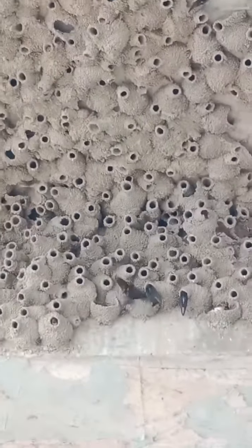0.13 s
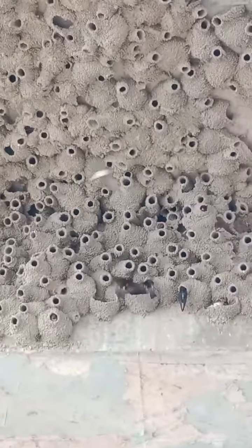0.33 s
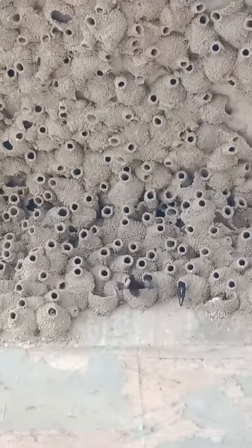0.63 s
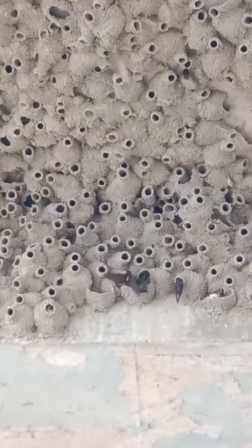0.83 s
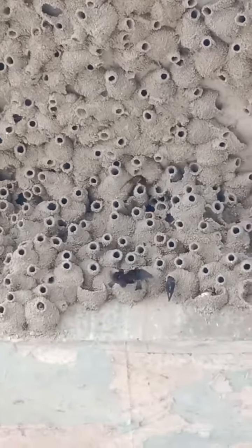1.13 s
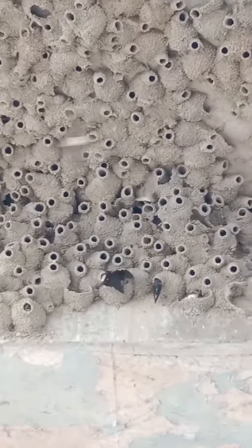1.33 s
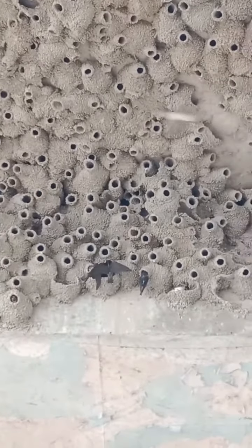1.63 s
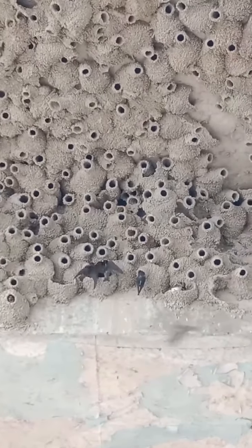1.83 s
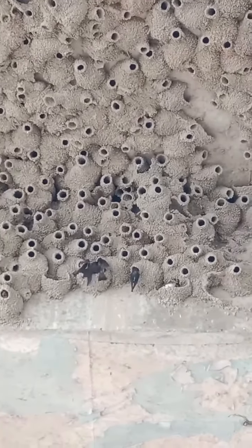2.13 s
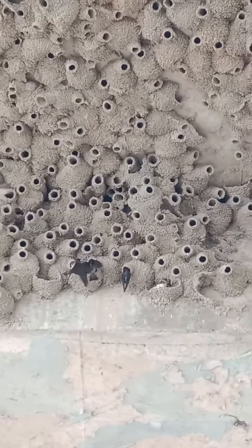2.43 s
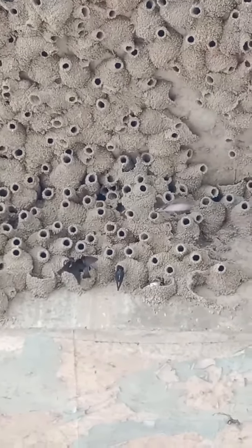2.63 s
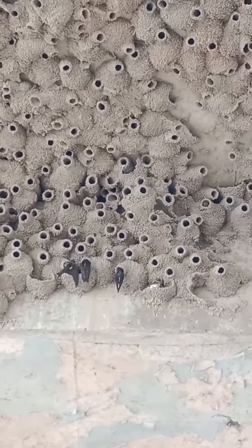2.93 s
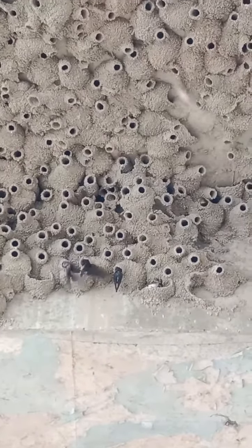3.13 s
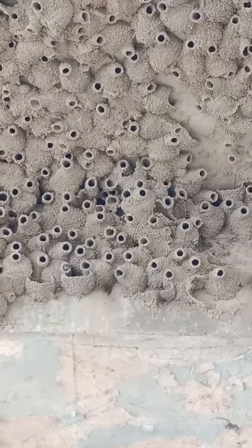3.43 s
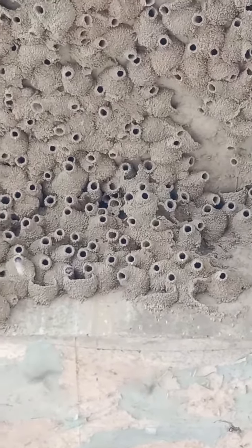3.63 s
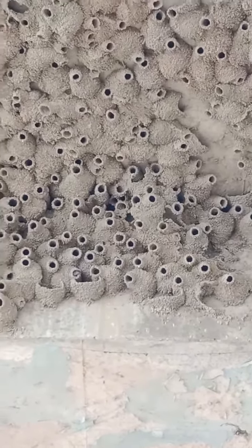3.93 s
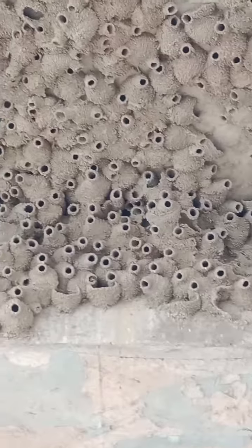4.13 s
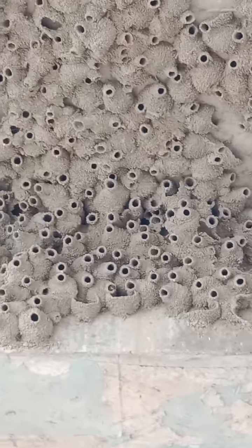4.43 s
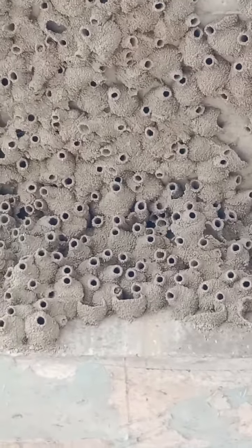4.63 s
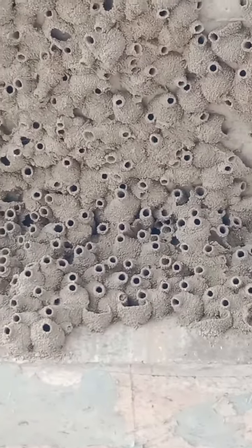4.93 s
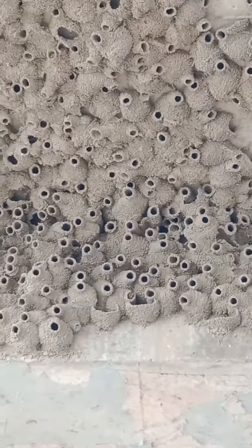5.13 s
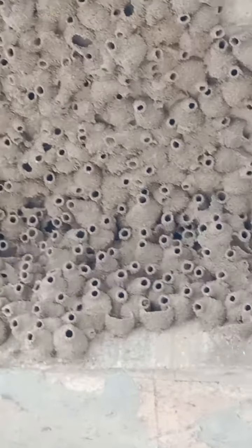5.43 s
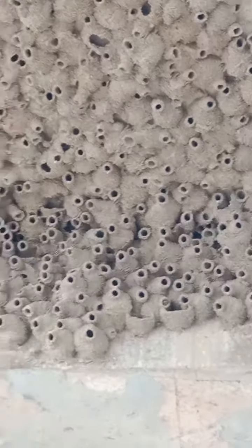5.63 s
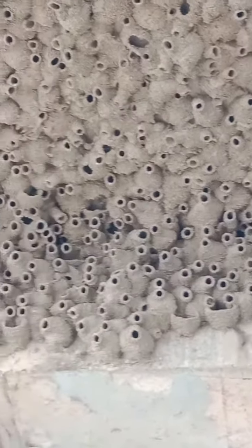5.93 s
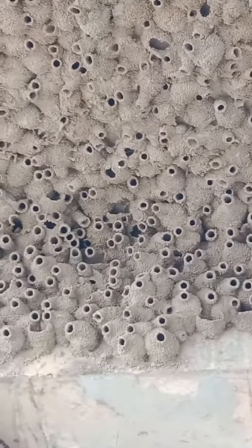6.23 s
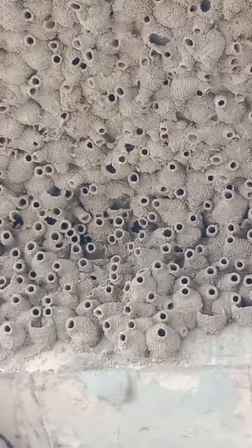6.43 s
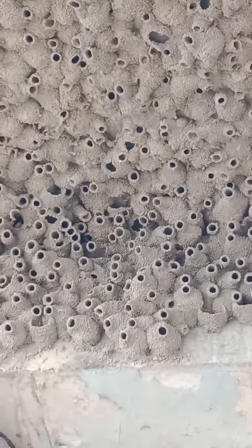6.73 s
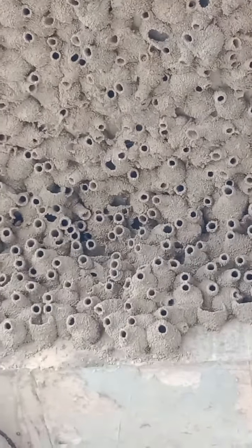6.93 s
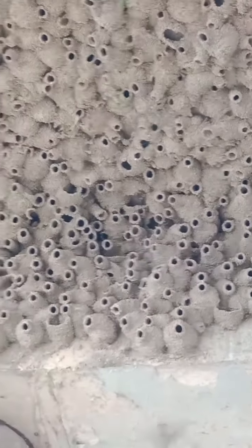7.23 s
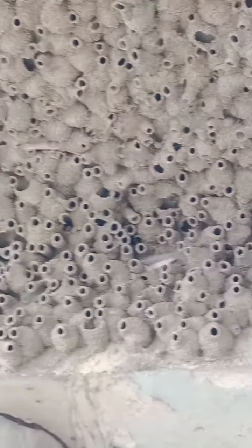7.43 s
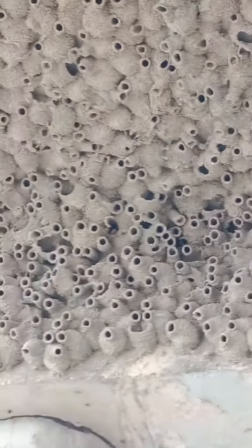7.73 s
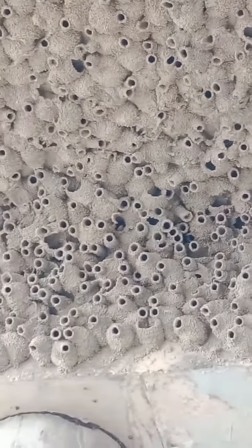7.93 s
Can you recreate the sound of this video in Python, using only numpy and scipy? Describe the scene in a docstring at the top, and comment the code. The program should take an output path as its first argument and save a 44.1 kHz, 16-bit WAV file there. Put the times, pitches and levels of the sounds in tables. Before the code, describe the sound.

Outdoors beside a wall of nests, many swallows twitter together in thick pulsing bursts, mixed with raspy churrs and little steady pips. The crowd then recedes and brief, sharp chirps stand apart, mostly sliding steeply downward, with occasional buzzes and a rapid twitter near the middle. Close wall reflections blur them slightly. A dull airy wash and faint deep wind thumps lie below; the mono sound is dull on top and slightly grainy.

```python
"""A wall of mud nests where a swallow colony calls, heard through a small mono microphone that loses its treble.
Near birds are gliding tones: mostly falling whistles, buzzy churrs, short pips and a quick twitter, with echoes.
The far flock is a swelling hiss: whistles, blips and noise, blurred by echoes and let through in three bands.
Below it lie a dull noise wash with narrow tonal traces, faint low air, and wind bumping the microphone.
A noise suppressor and a faint treble fizz like an audio coder's colour it all; table levels are ahead of these."""
import sys
import numpy as np
from scipy import signal
from scipy.fft import rfft, irfft, next_fast_len
from scipy.io import wavfile
from scipy.ndimage import uniform_filter1d

SR = 44100
rng = np.random.default_rng(int(sys.argv[2]) if len(sys.argv) > 2 else 0)


def master_out(mix):
    """Clip the mix to full scale and print it as 16-bit PCM to the path in sys.argv[1]."""
    frames = np.transpose(np.atleast_2d(mix))
    ceiling = np.clip(frames, -1, 1)
    pcm = np.round(ceiling * 32767).astype(np.int16)
    wavfile.write(sys.argv[1], SR, pcm)


N = 356460
FRAME, HOP = 512, 128  # short-time spectrum [samples]

ECHO_DB, ECHO_DB_PER_S = -4, -150  # wall echo; a later one has come further and is weaker
SECOND_ECHO_S, SECOND_ECHO_DB = .021, -14.5  # from the ledge below, after the first
# once under way, a whistle is loudest where its pitch passes the resonance of the open beak
BEAK_HZ, BEAK_DB_PER_KHZ2 = 5200, -4
# near whistles, mostly falling: (time [s], length [s], first pitch [Hz], last pitch [Hz], bend [power],
# start level [dB], level at the beak resonance [dB], wall echo delay [s])
WHISTLE_CALLS = [(0.846, 0.063, 6800, 3430, 3.6, -34, -37, 0.0075),
                 (1.104, 0.048, 6700, 7000, 1.3, -50, -44, 0.0043),
                 (1.315, 0.047, 6300, 5570, 1.5, -49, -44, 0.0046),
                 (1.642, 0.076, 6430, 2975, 4.3, -50.5, -40.5, 0.018),
                 (2.531, 0.051, 6840, 3540, 2.6, -46.5, -42, 0.0075),
                 (2.616, 0.034, 5960, 2530, 1.4, -47, -41, 0.014),
                 (2.826, 0.045, 6100, 6400, 1.2, -57, -57, 0.0058),
                 (2.874, 0.025, 5770, 3450, 1.1, -50.5, -46.5, 0.0067),
                 (2.893, 0.058, 6640, 3210, 1.3, -47, -46.5, 0.013),
                 (2.948, 0.016, 5100, 2720, 1.1, -51.5, -43, 0.011),
                 (3.026, 0.062, 6900, 3250, 3.1, -51, -45.5, 0.01),
                 (3.135, 0.047, 6400, 3510, 1.8, -49.5, -37.5, 0.021),
                 (3.148, 0.046, 6310, 3285, 1.4, -49, -42.5, 0.019),
                 (3.186, 0.032, 6060, 4070, 1.2, -47.5, -46, 0.0023),
                 (3.606, 0.081, 6500, 3000, 3.3, -64.5, -48, 0.004),
                 (3.674, 0.048, 6150, 3310, 4.1, -49.5, -38.5, 0.0041),
                 (3.666, 0.033, 7200, 6100, 1.4, -52, -47, 0.0051),
                 (3.737, 0.057, 6350, 3175, 2.6, -49, -34.5, 0.011),
                 (3.864, 0.046, 6600, 3330, 2.1, -59.5, -45.5, 0.018),
                 (3.968, 0.032, 6300, 3490, 1.2, -52, -47, 0.0084),
                 (3.989, 0.058, 6050, 3490, 2.1, -45.5, -38, 0.011),
                 (4.031, 0.013, 8200, 6400, 1.1, -42, -39.5, 0.0055),
                 (4.044, 0.045, 6400, 6540, 1.2, -44.5, -40, 0.006),
                 (4.066, 0.032, 6200, 3700, 1.5, -42.5, -39, 0.008),
                 (4.303, 0.025, 6500, 4010, 1.6, -58, -54.5, 0.023),
                 (4.309, 0.052, 6300, 3400, 1.9, -59, -49, 0.0081),
                 (4.345, 0.032, 6300, 4140, 1.4, -58, -50, 0.009),
                 (4.375, 0.05, 6800, 6000, 2.6, -56, -52, 0.011),
                 (4.601, 0.028, 5850, 3570, 1.8, -62, -52, 0.0072),
                 (4.838, 0.06, 6350, 4530, 2.4, -60.5, -50, 0.0088),
                 (4.948, 0.065, 7200, 4280, 1.4, -52.5, -44.5, 0.0098),
                 (5.043, 0.023, 6260, 3930, 0.95, -50, -51, 0.0026),
                 (5.074, 0.053, 6550, 4510, 3, -56.5, -54, 0.01),
                 (5.239, 0.056, 6200, 4000, 1.9, -54, -45.5, 0.01),
                 (5.259, 0.05, 6490, 3290, 3.1, -49.5, -42.5, 0.0066),
                 (5.322, 0.02, 6400, 4100, 1.3, -46.5, -33.5, 0.006),
                 (5.451, 0.044, 6600, 3590, 1.6, -53, -46.5, 0.031),
                 (5.597, 0.048, 6250, 4000, 1.8, -52, -46.5, 0.004),
                 (5.651, 0.028, 6480, 4300, 1.1, -57, -46, 0.018),
                 (5.763, 0.034, 6380, 4530, 5.5, -55.5, -46, 0.0023),
                 (5.79, 0.025, 4850, 3840, 1.2, -42, -44.5, 0.009),
                 (5.796, 0.047, 6390, 6280, 1.1, -53.5, -53.5, 0.006),
                 (5.899, 0.064, 6990, 2990, 1.9, -47, -36.5, 0.0032),
                 (6.045, 0.047, 6300, 3090, 1.8, -53, -42, 0.024),
                 (6.461, 0.058, 6500, 4300, 2.4, -59.5, -46.5, 0.008),
                 (6.691, 0.045, 6200, 5010, 2.8, -58, -55, 0.0055),
                 (7.043, 0.04, 6750, 5700, 1.8, -53.5, -48.5, 0.006),
                 (7.207, 0.059, 7050, 3320, 3.6, -66.5, -52, 0.0036),
                 (7.418, 0.063, 6350, 3210, 4.1, -50.5, -45, 0.008),
                 (7.545, 0.045, 7050, 6300, 1.2, -60, -50, 0.0061),
                 (7.558, 0.068, 6350, 3320, 3.5, -57.5, -41, 0.01),
                 (7.575, 0.024, 5200, 3180, 1.2, -55, -50, 0.009),
                 (7.711, 0.045, 6100, 4860, 1.7, -45.5, -40.5, 0.0079),
                 (7.76, 0.045, 6500, 7100, 0.87, -54, -40, 0.005),
                 (7.777, 0.064, 6250, 2990, 3.6, -44.5, -39, 0.007),
                 (7.815, 0.038, 6400, 2296, 1.1, -45, -44, 0.0087),
                 (7.828, 0.013, 8000, 5520, 0.98, -39.5, -46.5, 0.011)]


def whistles():
    """Near whistles, favoured by the beak resonance, each echoed by the wall and then the ledge."""
    out = np.zeros(N)
    for s, length, first_hz, last_hz, bend, start_db, beak_db, echo_s in WHISTLE_CALLS:
        middle_and_end = np.array([.5, .8])
        passing_hz = first_hz - (first_hz - last_hz) * middle_and_end ** bend
        levels_db = beak_db + BEAK_DB_PER_KHZ2 * ((passing_hz - BEAK_HZ) / 1000) ** 2
        call = whistle(length, first_hz, last_hz, bend, start_db, *levels_db)
        add(out, s, call)
        add(out, s + echo_s, amp(ECHO_DB + ECHO_DB_PER_S * echo_s) * call)
        add(out, s + echo_s + SECOND_ECHO_S, amp(SECOND_ECHO_DB) * call)
    return out


def whistle(length, first_hz, last_hz, bend, start_db, middle_db, end_db):
    """A tone bending from first to last pitch with a grainy burr; the voice gives out at the low end."""
    u = np.linspace(0, 1, round(length * SR))
    hz = first_hz - (first_hz - last_hz) * u ** bend
    burr = evened(amp(3.3 * wobble(len(u), 60)))
    level = burr * amp(np.interp(u, [.12, .5, .8], [start_db, middle_db, end_db]))
    low_end = np.clip((hz - 2700) / 1100, 0, 1)
    unsteady_hz = hz * (1 + .012 * wobble(len(u), 40))
    return level * low_end * signal.windows.tukey(len(u), .15) * tone(unsteady_hz)


# buzzy churrs: (time [s], length [s], middle pitch [Hz], slide over the note [Hz], level [dB],
# octave over the fundamental [dB], mean throb rate [per s])
CHURR_CALLS = [(0.131, 0.12, 3600, 501, -46.5, -28, 70), (0.134, 0.11, 5170, 202, -49, -41, 75),
               (0.255, 0.19, 4380, 306.5, -42, -22, 66), (0.605, 0.23, 4310, -900, -43.5, -26.5, 90),
               (1.19, 0.12, 4910, -47, -48.5, -30, 77), (1.834, 0.1, 3007, -44, -51, 1, 68),
               (2.019, 0.13, 3173, -52, -49, -11.5, 42), (2.225, 0.12, 3124, -63, -48.5, -5.5, 69),
               (2.661, 0.12, 4370, -52, -47.5, -37, 64), (3.145, 0.083, 2836, -54, -57.5, -35, 69),
               (3.671, 0.19, 2984, -49.5, -55.5, -9.5, 74), (3.703, 0.14, 4930, -42.5, -46.5, -28.5, 60),
               (4.032, 0.046, 3183, -41, -48, -2, 60), (4.493, .07, 4050, -42, -52, -31, 91),
               (4.716, 0.075, 4730, -56.5, -47, -34, 110), (4.945, 0.075, 4300, -49.5, -46, -35, 80),
               (5.214, 0.028, 3670, -48.5, -55, -3.5, 79), (5.596, 0.115, 3680, -45.5, -58.5, -28, 42),
               (6.827, 0.028, 3410, -54.5, -51.5, -5, 120), (6.886, 0.076, 3620, -45.5, -45.5, -24.5, 54),
               (7.05, 0.048, 3160, -43.5, -54.5, -3.5, 57), (7.647, 0.14, 4325, -50.5, -45, -31, 54),
               (7.96, 0.27, 4160, -41.5, -57.5, -26, 56)]


def churrs():
    """Near buzzy calls, one after another and sometimes overlapping."""
    out = np.zeros(N)
    for s, *shape in CHURR_CALLS:
        add(out, s, churr(*shape))
    return out


def churr(length, hz, slide_hz, db, octave_db, rate):
    """A hoarse note chopped into throbs; each throb swells while its pitch flicks up."""
    count = round(length * SR)
    uneven_rate = rate * (1 + .3 * wobble(count, 500))
    phase = np.cumsum(uneven_rate) / SR % 1
    throb = .35 + np.sin(np.pi * phase ** 1.36) ** 2
    hoarse = evened(throb * amp(3.6 * wobble(count, 54)))
    slide = hz + slide_hz * np.linspace(-.5, .5, count)
    pitch = slide * (1 + .22 * (phase - .6) + .03 * wobble(count, 60))
    return amp(db) * hoarse * tone(pitch, octave_db) * signal.windows.tukey(count, .08)


# short pips: (time [s], peak level [dB], pitch [Hz])
PIP_CALLS = [(.787, -43, 2280), (1.086, -42, 2280), (0.841, -36.5, 2290), (1.0066, -40, 2220),
             (1.2361, -35.5, 2340), (1.4277, -37.5, 2180), (2.0028, -38, 2300), (2.4184, -37.5, 2350),
             (2.905, -38.5, 3020), (2.962, -44, 2400)]


def pips():
    """Steady tones of 11 ms that swell and fade in one smooth hump."""
    out = np.zeros(N)
    for s, peak_db, hz in PIP_CALLS:
        note = tone(np.full(500, float(hz))) / np.sqrt(2)
        add(out, s, amp(peak_db) * note * np.hanning(500))
    return out


# twitter notes: (time [s], length [s], level added to the note shape [dB])
TWITTER_CALLS = [(4.886, 0.018, -34), (4.907, .016, -35), (4.926, 0.015, -30.5)]
# shape of each note, which dips, then flicks up:
# (share of the note [0-1], pitch [Hz], relative level [dB], octave over the fundamental [dB])
TWITTER_SHAPE = [(0, 3000, -8, 0.5), (.37, 2188, -17, 10), (.6, 2786, -16, -1.5), (.85, 4370, -2.5, -11.5),
                 (1, 3730, -13, -16)]


def twitter():
    """A quick run of notes whose pitch, level and octave follow one smoothed contour."""
    out = np.zeros(N)
    share, *columns = np.transpose(TWITTER_SHAPE)
    for s, length, note_db in TWITTER_CALLS:
        u = np.linspace(0, 1, round(length * SR))
        hz, db, octave_db = (uniform_filter1d(np.interp(u, share, c), size=60) for c in columns)
        add(out, s, amp(note_db + db) * tone(hz, octave_db) * signal.windows.tukey(len(u), .2))
    return out


def near_birds():
    """All the calls that stand out."""
    return whistles() + churrs() + pips() + twitter()


SHRILL_HZ, SHRILL_FADES = 6730, 0.79  # the top edge sinks faster than the high band: extra dB per dB
# colour of the flock: (pitch [Hz], relative level [dB per Hz])
FLOCK_SPECTRUM = [(1120, -32.5), (1900, -13.5), (2050, -12), (2340, -5.5), (2850, -6.5), (3960, -5),
                  (4940, -5), (6390, -13.5), (6780, -16.5), (7920, -22.5), (10300, -51), (17400, -120)]
# bands the noise suppressor darkens, and one it leaves, in quiet passages: (pitch [Hz], width [Hz], gain [dB])
QUIET_BANDS = [(2160, 445, -12), (2770, 85, 6), (3076, 540, -5.5)]


def flock():
    """Hundreds of far calls smeared by echoes into a hiss; its low, middle and high bands swell apart."""
    calls = np.zeros(N)
    for when, long, first, last, bend, loud in rng.random((260, 6)):
        db = 5 * loud
        call = whistle(0.022 + 0.052 * long, 5000 + 2000 * first, 2300 + 1500 * last, 1 + 4.2 * bend,
                       db - 0.5, db, db)
        add(calls, when * N / SR, call)
    close = .16 * evened(calls) + .65 * evened(chatter())
    blur = signal.oaconvolve(close, tail(0.29))[:N]
    hiss = filtered(rng.standard_normal(N), FLOCK_SPECTRUM)
    hiss = hiss + filtered(hiss, [(6000, -27.5), (6800, -1)])  # extra smooth hiss fills the top edge

    def rule(s, hz, patches):
        low = np.clip((3500 - hz) / 300, 0, 1)
        high = np.clip((hz - 5200) / 600, 0, 1)
        mid_db, low_db, high_db = flock_levels(s[0])
        db = mid_db + low * (low_db - mid_db) + high * (high_db - mid_db)
        db = db + SHRILL_FADES * np.clip((hz - SHRILL_HZ) / 500, 0, 1) * (high_db + 47.5)
        quiet = np.clip((-44.0 - low_db) / 12, 0, 1)
        bands_db = sum(band_db * np.exp(-((hz - f) / width) ** 2) for f, width, band_db in QUIET_BANDS)
        # the noise suppressor leaves thin held streaks in quiet passages, most in the low band
        streaks_db = (1.1 + quiet * (.8 + 3.8 * low)) * np.minimum(patches, 1.2)
        return unit(FLOCK_SPECTRUM, hz) * amp(db + quiet * bands_db + streaks_db)

    mix = close + .25 * evened(blur) + .36 * evened(hiss)
    return shaped(mix + 0.0079 * rng.standard_normal(N), rule, patch_bins=2, patch_frames=17)


def chatter():
    """A rain of tiny sliding blips, the throbs of many churring birds."""
    out = np.zeros(N)
    t = np.arange(240) / SR
    for pitch, slide in rng.random((60, 2)):
        hz = 2500 + 3700 * pitch + 260000 * (slide - .25) * (t - t.mean())  # most slide upward
        blip = np.hanning(len(t)) * tone(hz)
        for when, size in rng.random((170, 2)):
            add(out, when * N / SR, blip * amp(7 * size))
    return out


RISE_DB_PER_S, FALL_DB_PER_S = 418, 453
LOW_LATE_S, HIGH_SAG_DB_PER_S = 0.006, 28  # the low band opens late; the high band sags
# outer bands: level at a murmur of -50 dB [dB], change per change of the murmur [dB per dB]
LOW_MURMUR_DB, LOW_MURMUR_SLOPE = -50 - 2.74, 1.27
HIGH_MURMUR_DB, HIGH_MURMUR_SLOPE = -50 - 3.5, 1
# stretches where the suppressor's gate opens on the flock: (time [s], length before the fall [s],
# middle band [dB], low band [dB], high band [dB])
FLOCK_OPENINGS = [(0.0, 0.027, -43, -45, -38.5), (0.126, 0.33, -40.5, -43.5, -36),
                  (0.596, 0.349, -40.5, -44, -36), (0.972, 0.13, -41.5, -45.5, -38.5),
                  (1.154, 0.08, -45, -50, -43.5), (1.262, 0.076, -42.5, -43.5, -38.5),
                  (1.448, 0.1, -43.5, -46, -45.5), (1.642, 0.11, -41.5, -41, -39.5),
                  (1.829, 0.13, -43, -42.5, -41), (2.024, 0.099, -42.5, -41, -39),
                  (2.265, 0.099, -42, -43.5, -44), (2.43, 0.097, -47.5, -57.5, -38),
                  (2.63, 0.14, -50.5, -49.5, -45.5), (2.891, 0.092, -45, -45, -50),
                  (3.037, 0.069, -54.5, -53, -50), (3.146, 0.058, -50, -47.5, -44),
                  (3.695, 0.15, -39, -50.5, -41), (3.892, 0.051, -51, -59.5, -56.5),
                  (3.993, 0.12, -46, -49.5, -45), (4.348, 0.24, -49, -55.5, -47.5),
                  (4.712, 0.08, -44.5, -47.5, -41.5), (4.897, 0.14, -44.5, -49.5, -42.5),
                  (5.066, 0.065, -44.5, -54, -51.5), (5.167, 0.15, -51.5, -54.5, -61.5),
                  (5.295, 0.12, -44.5, -52, -42.5), (5.449, 0.094, -51, -61, -60),
                  (5.605, 0.11, -47.5, -53.5, -50.5), (5.784, 0.09, -45.5, -53.5, -44),
                  (5.927, 0.084, -46.5, -54.5, -46), (6.059, 0.099, -54.5, -63.5, -51.5),
                  (6.492, 0.077, -49, -53, -48.5), (6.69, 0.065, -51.5, -56.5, -60.5),
                  (6.852, 0.15, -45, -48, -47), (7.038, 0.075, -44.5, -46.5, -51),
                  (7.445, 0.061, -44.5, -54.5, -47), (7.607, 0.029, -47.5, -52.5, -44.5),
                  (7.644, 0.12, -44.5, -46.5, -48), (7.776, 0.079, -45, -51.5, -40),
                  (7.971, 0.14, -59, -57, -70)]
# murmur of the flock between the openings: (time [s], level [dB])
FLOCK_MURMUR = [(0, -40), (.97, -44), (1.6, -43.5), (2.2, -47.5), (2.4, -42), (3.04, -46.5), (3.3, -49.5),
                (3.6, -57.5), (3.9, -56), (4.2, -57), (4.6, -51), (5.2, -52.5), (5.9, -49.5), (6.3, -49.5),
                (6.75, -51.5), (7.2, -55), (7.4, -51.5), (7.9, -62), (8.08, -58)]


def flock_levels(s):
    """Middle, low and high bands in dB: listed openings that rise, hold and fall over the murmur."""
    start, length, mid_db, low_db, high_db = np.transpose(FLOCK_OPENINGS)[:, :, None]
    age = s[None] - start
    after_db = -FALL_DB_PER_S * np.maximum(age - length, 0)
    shape_db = RISE_DB_PER_S * np.minimum(age, 0) + after_db
    late_db = RISE_DB_PER_S * np.minimum(age - LOW_LATE_S, 0) + after_db
    sagging_db = shape_db - HIGH_SAG_DB_PER_S * np.clip(age, 0, length)
    murmur = np.interp(s, *np.transpose(FLOCK_MURMUR))
    low_murmur = LOW_MURMUR_DB + LOW_MURMUR_SLOPE * (murmur + 50)
    high_murmur = HIGH_MURMUR_DB + HIGH_MURMUR_SLOPE * (murmur + 50)
    return (summed_db(murmur, *(mid_db + shape_db)),
            summed_db(low_murmur, *(low_db + late_db)),
            summed_db(high_murmur, *(high_db + sagging_db)))


WASH_FOLLOWS, WASH_DRIFT = 0.44, 0.1  # dB per dB of an opening over the murmur; rms share of the centre pitch
EDGE_OVER_DB, EDGE_TOP_HZ = 13.5, 926  # usual distance of the edge under the wash; where it begins
# outdoor wash: (time [s], level before the lift of the openings [dB], centre before its drift [Hz])
WASH_PATH = [(0.0, -46.5, 1120), (0.06, -48.5, 1286), (0.83, -49, 1180), (1.17, -47, 1480),
             (1.26, -49.5, 1020), (1.57, -48, 1476), (1.69, -47.5, 1280), (2.16, -49, 1424),
             (2.43, -45, 1410), (2.54, -48.5, 1237), (3.19, -47.5, 1366), (3.56, -56, 1217),
             (3.76, -57.5, 1320), (3.91, -53.5, 1113), (3.98, -52, 1500), (4.07, -51.5, 1140),
             (4.19, -55, 1205), (4.36, -53.5, 1347), (4.73, -52.5, 1072), (5.4, -51, 1223),
             (6.48, -53.5, 1020), (6.55, -48, 1380), (6.86, -52.5, 1165), (7.0, -47.5, 1584),
             (7.34, -53.5, 1037), (7.51, -51, 1514), (7.54, -52.5, 1390), (7.79, -53, 1194),
             (7.92, -58, 1167), (8.08, -55.5, 1330)]
# colour of the wash: (pitch [Hz], relative level [dB per Hz])
WASH_SPECTRUM = [(240, -53.5), (400, -29), (624, -9), (692, -4.5), (979, -1), (1180, -4.5), (1380, -2),
                 (1750, -7), (2050, -12.5), (2730, -21.5), (4620, -120)]
# level that steers the lowest part of the wash: (time [s], level [dB])
WASH_LOW_EDGE = [(0.0, -60.5), (0.16, -77.5), (0.4, -58), (0.65, -56.5), (0.83, -72), (1.19, -56),
                 (1.26, -73), (1.35, -62), (1.8, -71.5), (1.93, -58.5), (1.98, -75), (2.29, -70.5),
                 (2.41, -57), (2.45, -79.5), (2.63, -56), (2.7, -67.5), (3.13, -59.5), (3.22, -71.5),
                 (3.76, -71.5), (3.87, -59), (3.94, -81.5), (4.14, -63), (4.25, -80), (4.5, -63),
                 (5.31, -72.5), (5.36, -61), (5.56, -82), (5.65, -63), (6.34, -76.5), (6.41, -63),
                 (6.71, -60), (6.75, -67.5), (7.43, -68), (7.51, -76.5), (7.63, -59), (8.08, -77)]


def wash():
    """A dull band of outdoor noise whose weight drifts up and down in pitch, with tonal traces."""
    path_s, _, centre_hz = np.transpose(WASH_PATH)

    def rule(s, hz, patches):
        level_db = wash_level(s[0])
        centre = np.interp(s, path_s, centre_hz) * np.exp(WASH_DRIFT * wobble(s.size, 26))
        lean_db = np.maximum(-30 * np.log(np.maximum(hz, 300) / centre) ** 2, -6)
        edge_db = np.interp(s, *np.transpose(WASH_LOW_EDGE)) - level_db + EDGE_OVER_DB
        edge_db = edge_db * np.clip((EDGE_TOP_HZ - hz) / 150, 0, 1)
        streaks_db = 3.5 * np.minimum(patches, 1.2)  # dips more than it swells
        return unit(WASH_SPECTRUM, hz) * amp(level_db + lean_db + edge_db + streaks_db)

    noise = shaped(rng.standard_normal(N), rule, patch_bins=2.2, patch_frames=18.3)
    return noise + tonal_traces()


def wash_level(s):
    """The wash swells slowly and is let through a little more whenever the suppressor opens on the flock."""
    lift_db = flock_levels(s)[0] - np.interp(s, *np.transpose(FLOCK_MURMUR))
    slow_db = np.interp(s, *np.transpose(WASH_PATH)[:2])
    return slow_db + WASH_FOLLOWS * uniform_filter1d(lift_db, size=9)


# narrow tonal traces probably left by the noise suppressor in the wash:
# (time [s], length [s], pitch [Hz], level [dB], rms waver [share of pitch])
TONAL_TRACES = [(1.446, 0.16, 1418, -52.5, 0.0055), (3.958, 0.21, 1743, -56, 0.028),
                (6.529, 0.16, 1800, -55.5, 0.07), (6.951, 0.12, 1450, -52, 0.022)]


def tonal_traces():
    """Tones whose pitch and level waver at random."""
    out = np.zeros(N)
    for s, length, hz, db, waver in TONAL_TRACES:
        count = round(length * SR)
        trace = tone(hz * (1 + waver * wobble(count, 200)))
        trace = trace * amp(db + 3.5 * wobble(count, 150))
        add(out, s, trace * signal.windows.tukey(count, .4))
    return out


AIR_DB = -71.5  # before its flutter and the rise with the wash
# colour of the low air: (pitch [Hz], relative level [dB per Hz])
AIR_SPECTRUM = [(65, -27), (110, -2.5), (150, -5), (328, -4.5), (389, -6), (600, -7.5), (780, -22.5),
                (1320, -120)]


def air():
    """Faint low noise that rises with the wash."""
    t, s = np.arange(N) / SR, np.arange(0, N, HOP) / SR
    low = evened(filtered(rng.standard_normal(N), AIR_SPECTRUM))
    flutter = amp(AIR_DB + 1.8 * wobble(N, 2100))
    wash_db = np.interp(t, s, wash_level(s))
    return low * flutter * amp(0.55 * (wash_db - wash_db.mean()))


BREEZE_DB, BREEZE_SWING_DB, BUMP_DB_PER_S = -87, 4, 200  # mean level, rms swing, rise and fall of a bump
# wind bumps on the microphone, added to the breeze: (time of the peak [s], peak level [dB])
WIND_BUMPS = [(0.0, -71), (0.18, -73), (0.7, -64.5), (1.3, -74.5), (1.85, -76), (2.72, -74.5), (3.85, -71),
              (4.97, -66), (5.33, -70.5), (5.51, -61.5), (5.67, -56), (6.95, -62.5), (7.63, -67.5),
              (7.82, -71.5), (8.07, -62.5)]
# colour of the wind: (pitch [Hz], relative level [dB per Hz])
WIND_SPECTRUM = [(12, -47.5), (20, -24.5), (32, -18.5), (54, -5), (76, 13), (160, -7), (210, -38.5),
                 (350, -120)]


def wind():
    """Deep rumble of wind on the microphone: a wavering breeze with bumps that rise and fall."""
    t, s = np.arange(N) / SR, np.arange(0, N, HOP) / SR
    breeze_db = BREEZE_DB + BREEZE_SWING_DB * wobble(len(s), 30)
    bumps_db = [db - BUMP_DB_PER_S * abs(s - at) for at, db in WIND_BUMPS]
    wind_db = summed_db(breeze_db, *bumps_db)
    rumble = evened(filtered(rng.standard_normal(N), WIND_SPECTRUM))
    return rumble * amp(np.interp(t, s, wind_db))


def tail(t60):
    """Echo tail: sparse taps of random sign dying away by 60 dB in t60 seconds, energy 1."""
    at = np.arange(400, SR // 2, 20)
    taps = np.zeros(SR // 2 + 20)
    signs = rng.choice([-1., 1.], len(at))
    taps[at + rng.integers(0, 20, len(at))] = signs * amp(-60 * at / SR / t60)
    return taps / np.linalg.norm(taps)


def tone(hz, octave_db=-60):
    """A gliding sine of rms 1 plus its octave."""
    turn = 2 * np.pi * (np.cumsum(hz) / SR + rng.random())
    return np.sqrt(2) * (np.sin(turn) + amp(octave_db) * np.sin(2 * turn))


def wobble(count, smooth):
    """Smoothed noise of rms 1."""
    width = max(int(smooth), 2)
    once = uniform_filter1d(rng.standard_normal(count), width)
    return evened(uniform_filter1d(once, width))


def shaped(x, rule, patch_bins, patch_frames):
    """Flattens the spectrum of x, then scales each moment and pitch by rule(s, hz, random drifting patches)."""
    hz, s, z = signal.stft(x, SR, nperseg=FRAME, noverlap=FRAME - HOP)
    mean_power = uniform_filter1d(np.mean(abs(z) ** 2, 1), size=5)
    flat = z / np.sqrt(mean_power)[:, None]
    used = hz < 9500
    patches = rng.standard_normal(z[used].shape)
    for _ in range(2):
        patches = uniform_filter1d(patches, int(patch_bins), 0)
        patches = uniform_filter1d(patches, int(patch_frames), 1)
    flat[used] *= rule(s[None], hz[used, None], evened(patches))
    flat[~used] = 0
    return signal.istft(flat, SR, nperseg=FRAME, noverlap=FRAME - HOP)[1][:N]


def unit(points, hz):
    """A spectrum table as gains that give flat frames an rms of 1."""
    gain = amp(read(points, hz))
    return gain / np.sqrt(np.sum(gain ** 2) * 4 / 3)  # two spectrum sides over the window's noise width, 1.5


def filtered(x, points):
    """Applies a (pitch [Hz], gain [dB]) response."""
    size = next_fast_len(N)
    gain = amp(read(points, np.fft.rfftfreq(size, 1 / SR)))
    return irfft(rfft(x, size) * gain, size)[:N]


def read(points, hz):
    """A spectrum table, joined on a log-frequency axis."""
    f, value = np.transpose(points)
    return np.interp(np.log(hz + 1), np.log(f + 1), value)


def summed_db(*levels_db):
    """Level of several sounds heard together, adding their powers."""
    return 10 * np.log10(sum(10 ** (level / 10) for level in levels_db))


def amp(db):
    """Decibels to amplitude."""
    return 10 ** (np.asarray(db) / 20)


def evened(x):
    """Scales x to rms 1."""
    return x / np.sqrt(np.mean(abs(x) ** 2) + 1e-30)


def add(mix, s, sound):
    """Lays a sound into the mix at s seconds, cut at the end."""
    part = mix[round(s * SR):][:len(sound)]
    part += sound[:len(part)]


def scene():
    """Near birds with their reflections, over flock, wash, air and wind."""
    birds = near_birds()
    nests = np.zeros(700)  # the lumpy wall scatters each call over the next few milliseconds
    nests[rng.integers(60, 700, 16)] = rng.choice([-1., 1.], 16) / 4
    scattered = signal.oaconvolve(birds, nests)[:N]
    yard = signal.oaconvolve(birds, tail(0.32))[:N]
    mix = birds + amp(-8) * scattered + amp(-9.5) * yard
    mix = mix + flock() + wash() + air() + wind()
    return np.array([mix, mix])


def suppressed(x, margin_db, depth_db):
    """Noise suppressor: narrow bands that sit near their usual quiet level are turned down."""
    z = signal.stft(x, nperseg=FRAME, noverlap=FRAME - HOP)[2]
    power = abs(uniform_filter1d(abs(z) ** 2, size=16, axis=1))
    level_db = 10 * np.log10(power + 1e-20)
    quiet_db = uniform_filter1d(np.percentile(level_db, 20, axis=1), size=7)[:, None]
    cut_db = depth_db * np.clip(0.5 - (level_db - quiet_db) / margin_db, 0, 1)
    gain = amp(-uniform_filter1d(cut_db, size=8, axis=1))
    return signal.istft(z * gain, nperseg=FRAME, noverlap=FRAME - HOP)[1][:N]


FIZZ_RESPONSE = [(9000, -37.5), (10500, -14), (12500, -5), (14000, -10.5), (15500, -17.5)]


def coder_fizz(heard):
    highest = filtered(heard, [(4500, -18.5), (6000, -7.5)])
    high_power = uniform_filter1d(highest ** 2, size=1500)
    noise = amp(-0.5) * abs(high_power) ** 0.66 * rng.standard_normal(N)
    squared = amp(-15.0) * heard ** 2
    return filtered(squared + noise, [(8000, -120)] + FIZZ_RESPONSE)


HISS_DB, BAND_LIMIT_HZ = -99, 15500
# microphone response: (pitch [Hz], gain [dB])
MIC_RESPONSE = [(6600, -0.5), (7200, -11), (8000, -18.5), (9000, -29)]


def record(dry):
    """The microphone drops the treble; then come suppressor, coder fizz, faint hiss and a band limit."""
    heard = filtered(dry[0], MIC_RESPONSE)
    hiss = filtered(rng.standard_normal(N), [(6000, -25.0), (9500, -18.5), (11000, -29.5)])
    clean = suppressed(heard, margin_db=12.5, depth_db=6.5)
    full = clean + coder_fizz(heard) + amp(HISS_DB) * evened(hiss)
    band_limit = signal.firwin(511, BAND_LIMIT_HZ, window=("kaiser", 9), fs=SR)
    out = signal.oaconvolve(full, band_limit, "same")
    return np.array([out, out])


dry = scene()
out = record(dry)
master_out(out)
```